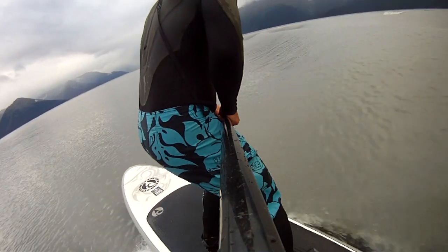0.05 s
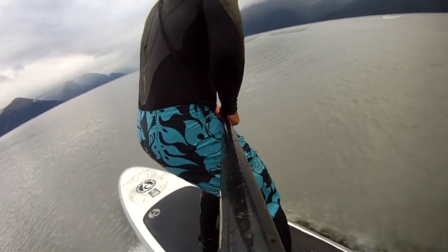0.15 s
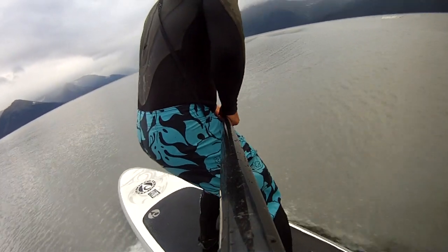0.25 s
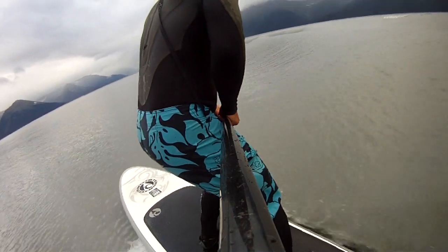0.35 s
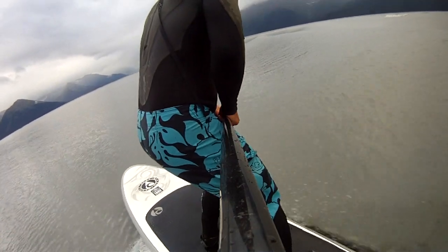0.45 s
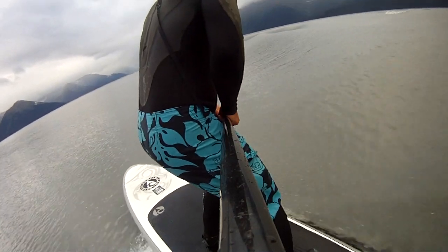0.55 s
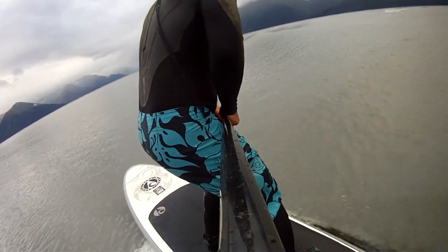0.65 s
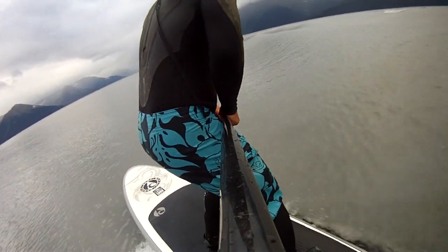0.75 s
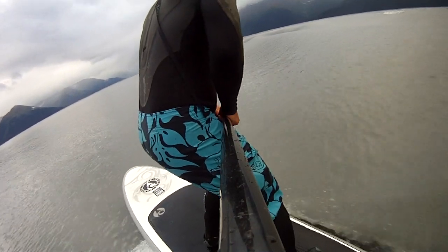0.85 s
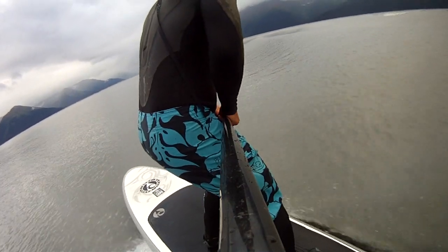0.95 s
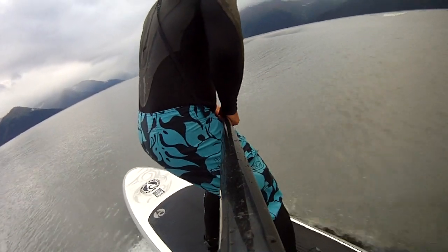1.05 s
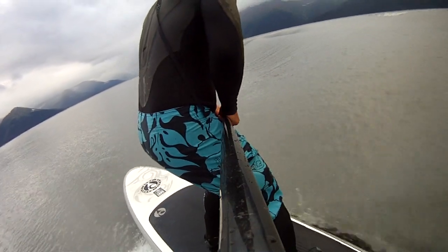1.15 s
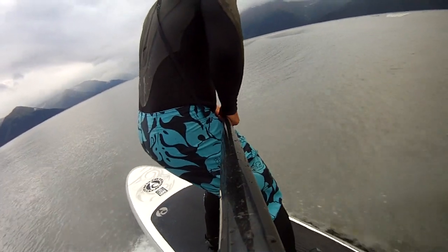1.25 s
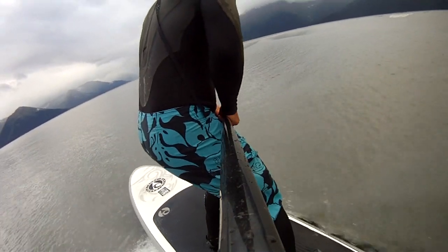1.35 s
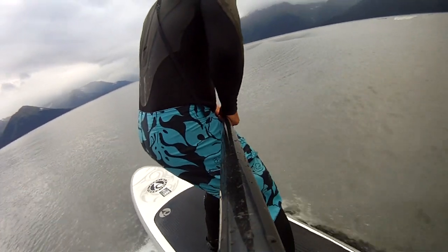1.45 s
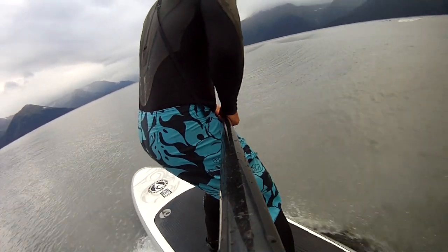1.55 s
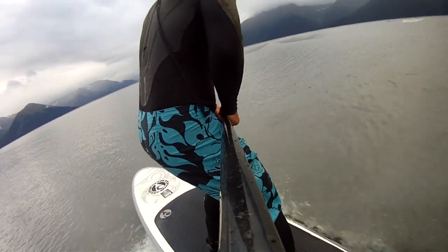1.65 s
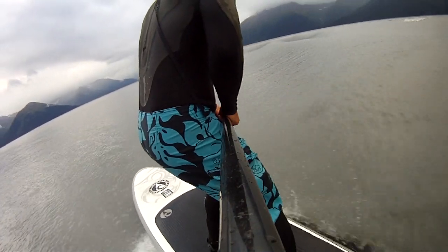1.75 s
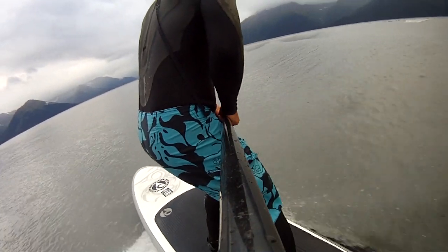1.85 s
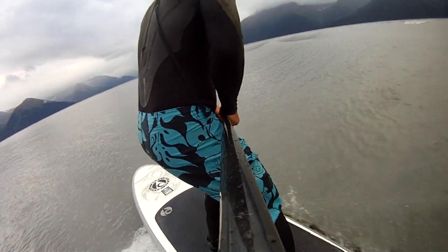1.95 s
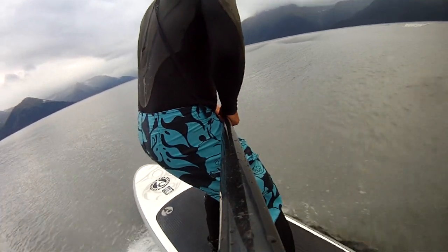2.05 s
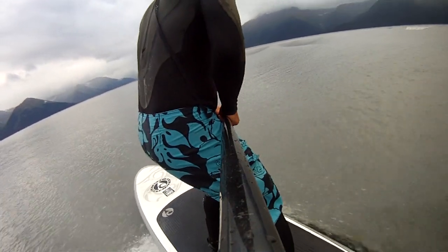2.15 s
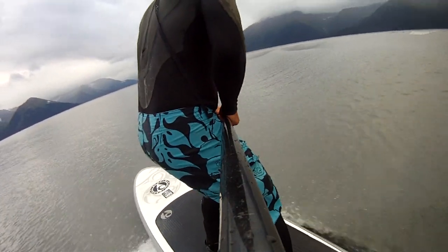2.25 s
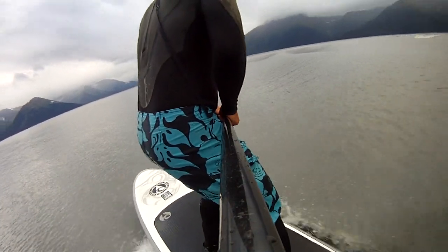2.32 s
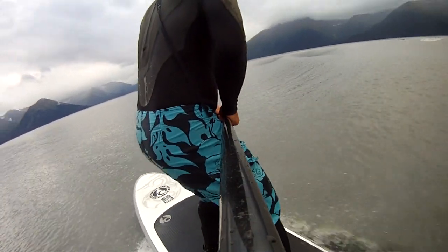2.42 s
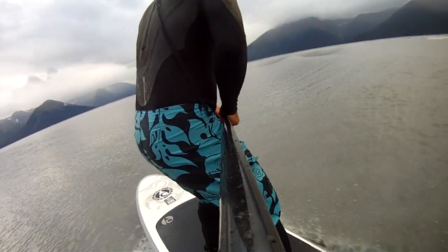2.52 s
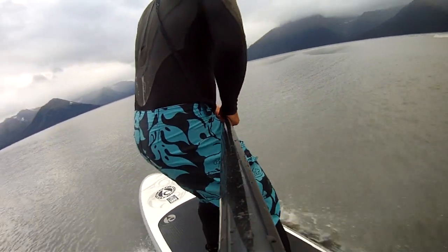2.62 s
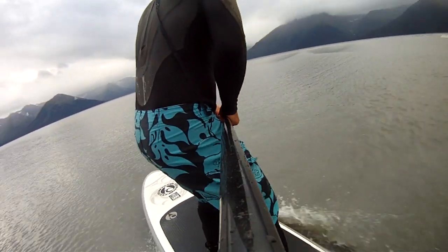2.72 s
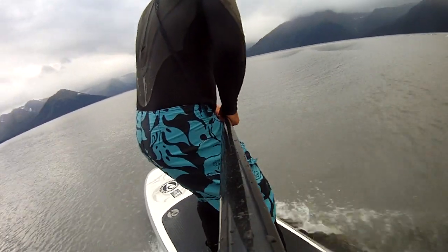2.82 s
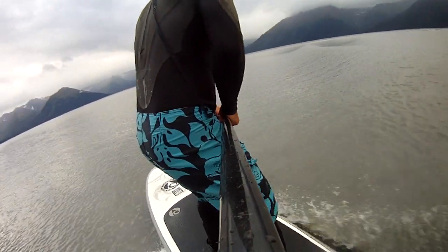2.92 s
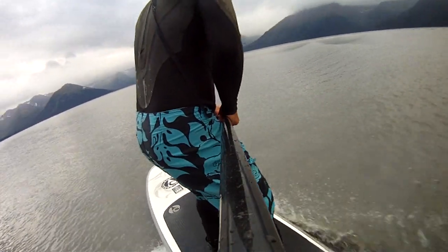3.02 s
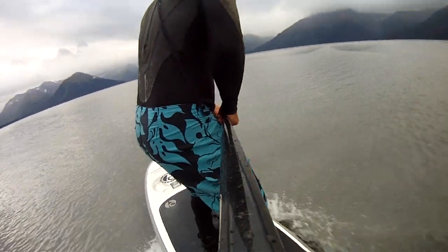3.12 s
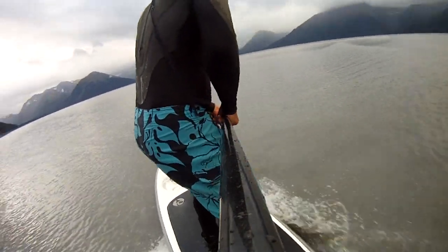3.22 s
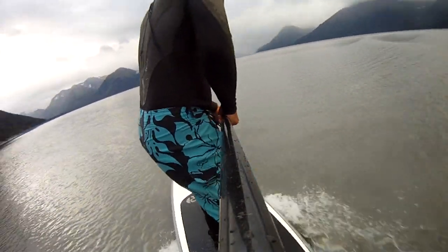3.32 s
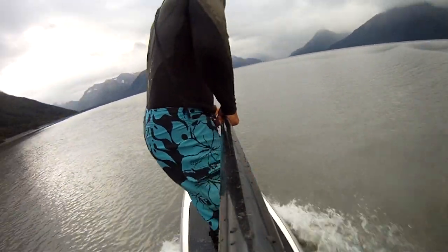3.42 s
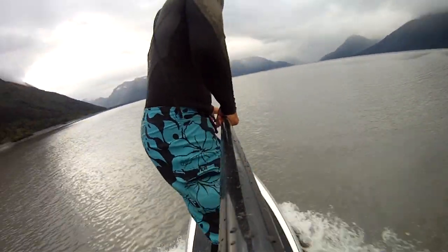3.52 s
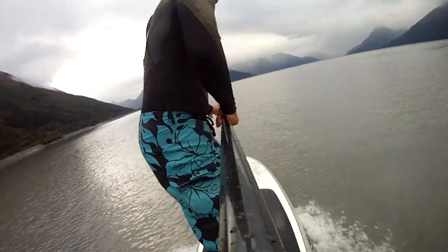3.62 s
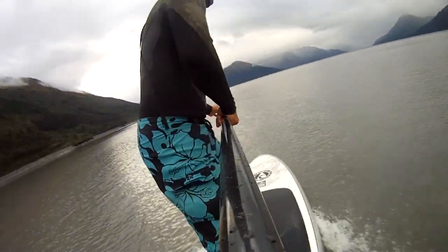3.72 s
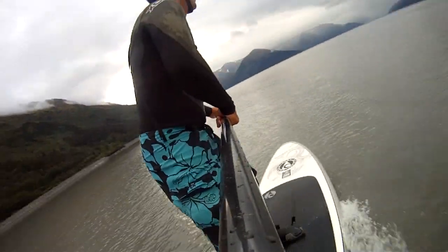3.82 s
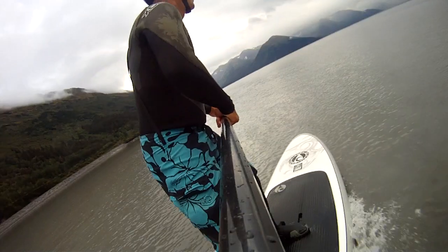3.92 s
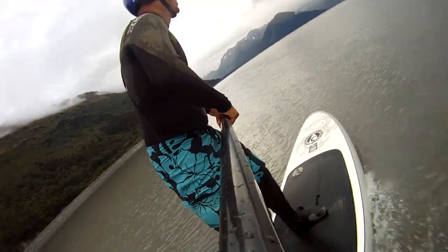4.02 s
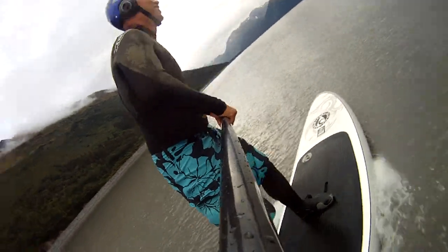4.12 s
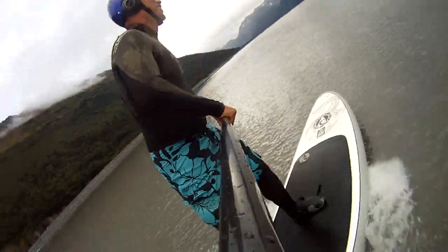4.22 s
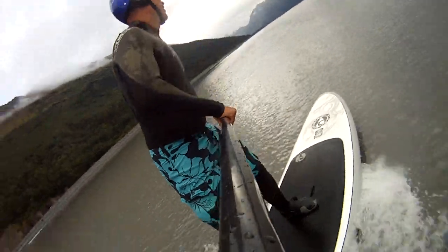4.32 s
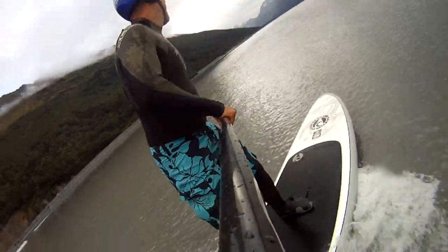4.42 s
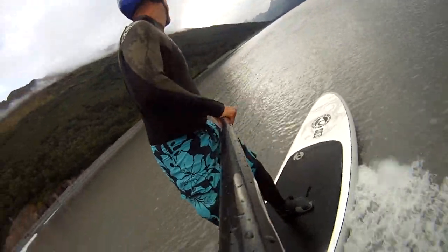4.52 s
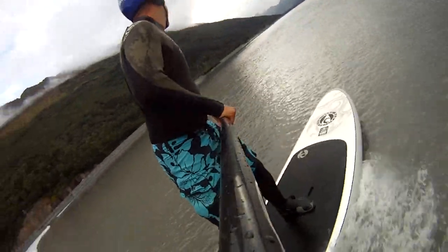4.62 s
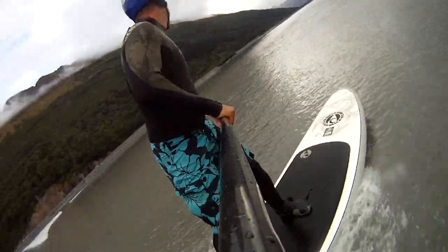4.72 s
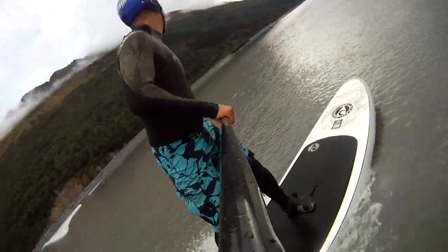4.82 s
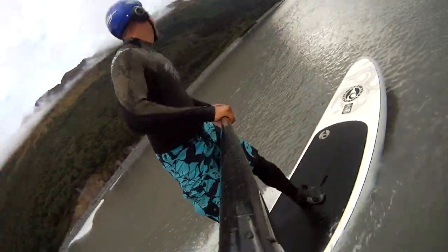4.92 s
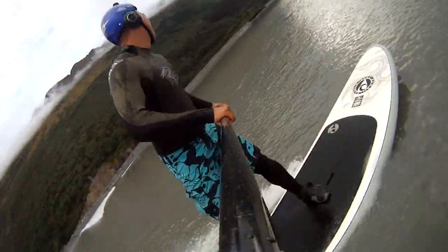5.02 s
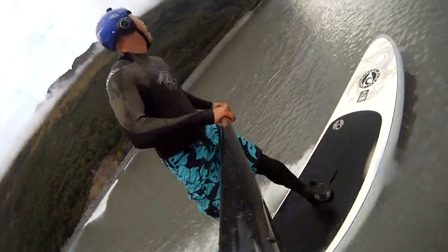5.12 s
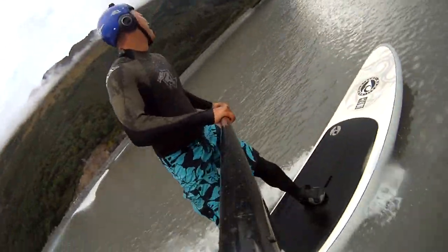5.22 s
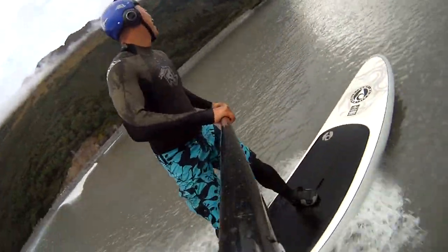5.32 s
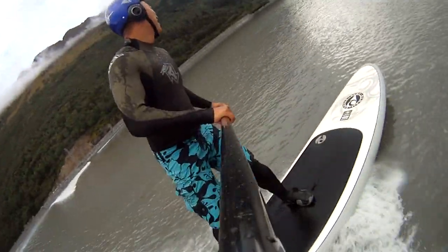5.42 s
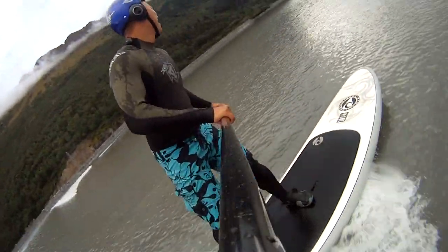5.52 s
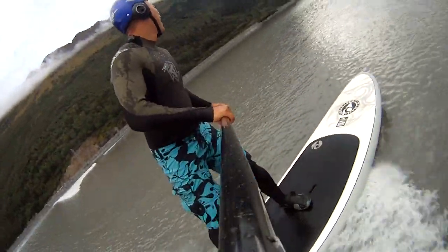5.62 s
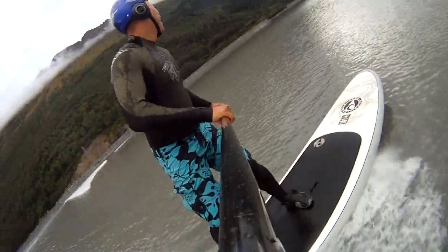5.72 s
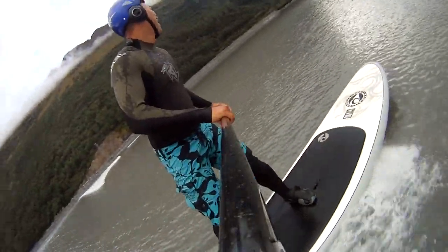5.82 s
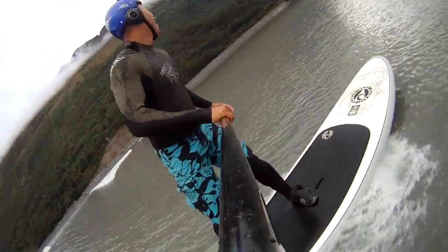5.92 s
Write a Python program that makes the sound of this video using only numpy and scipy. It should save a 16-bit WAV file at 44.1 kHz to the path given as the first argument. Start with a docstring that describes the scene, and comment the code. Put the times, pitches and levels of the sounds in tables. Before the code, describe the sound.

Close rushing spray and a low shudder as a paddleboard rides a wave, then thumps, clicks, a squeak and louder splashes.

```python
"""Spray and churning wake around a paddleboard on a wave, heard close up from the paddle.
The microphone is inside a camera's sealed housing, whose resonances colour the hiss of the water.
Drag keeps the paddle shaft shuddering at its bending mode. In a turn the shaft takes knocks and
the wet mount squeaks, clicks and creaks; then the board pounds over chop and the hull drums."""
import sys
import numpy as np
from scipy import signal
from scipy.fft import rfft, irfft, next_fast_len
from scipy.io import wavfile
from scipy.ndimage import uniform_filter1d, map_coordinates

SR = 44100
rng = np.random.default_rng(int(sys.argv[2]) if len(sys.argv) > 2 else 0)


def to_wav(s):
    """Save 16-bit WAV."""
    ch = np.atleast_2d(s).T  # columns
    pcm = np.round(np.clip(ch, -1, 1) * 32767)  # PCM
    wavfile.write(sys.argv[1], SR, pcm.astype(np.int16))


N = 262836

# Spray off the rail, easing as the board turns. Each row: time in seconds, level in dB before gain.
SPRAY_LEVELS = [(0.0, -43), (0.16, -45), (2.37, -45.5), (3.42, -48), (3.67, -50.5), (4.63, -49.5),
                (4.95, -54.5), (5.23, -55), (5.63, -49.5), (5.96, -51.5)]
# The board slapping into chop. Each row: start in seconds, hull drumming in dB, splash in dB.
SLAPS = [(3.17, -53, -44), (3.88, -38.5, -38), (4.78, -40.5, -42.5), (5.0, -50, -67)]
SLAP_RISE_S = 0.023
CRUISE_DB, WAKE_DB = -45.5, -42  # reference levels of spray and wake on the straight run


def spray():
    """Spray thrown off the rail patters and hisses through the housing."""
    # Its colour at the microphone. Each row: frequency in Hz, relative level in dB.
    colour = [(700, -32), (1300, -5), (2020, -7.5), (2300, 1.5), (2680, -2.5), (3050, -7), (3500, 0.5),
              (3800, -0.5), (4030, -8.5), (4700, -4.5), (5350, -4), (5700, -10.5)]
    drops = bubbles(rate=2500, hz=3530, cycles=0.98, spread_db=3.0)
    hiss = coloured(froth(drops, grain_db=-9.5, patchy_db=1.0), colour)
    return amp(curve(SPRAY_LEVELS) + 7) * hiss


def wake_level():
    """The wake's level in dB: it follows the spray and swells with the splash of each slap."""
    steady = amp(WAKE_DB + 0.53 * (curve(SPRAY_LEVELS) - CRUISE_DB))
    splash = sum(amp(db) * envelope(s, SLAP_RISE_S, SLAP_RISE_S, t60=1.95) for s, _, db in SLAPS)
    return 20 * np.log10(np.hypot(steady, splash))


def wake():
    """The wake churns with ringing bubbles."""
    # Its colour inside the housing. Each row: frequency in Hz, relative level in dB.
    colour = [(200, -52), (600, -26), (950, -15.5), (1130, -5.5), (1275, 1.5), (1470, -9), (1675, -3),
              (2010, -6), (2270, -6.5), (2650, -4.5), (3100, -12), (3520, -23), (4100, -36), (5600, -47)]
    cloud = bubbles(rate=1500, hz=1691, cycles=3.5, spread_db=1.5)
    churn = coloured(froth(cloud, grain_db=-9.5, patchy_db=0.5), colour)
    return amp(wake_level() + 0.24 * wobble(15)) * churn


def shudder():
    """Water dragging on the paddle keeps its bending mode swinging at a wandering pitch and strength."""
    # Strength of the shudder. Each row: time in seconds, overall level in dB before the mix.
    levels = [(0, -37), (2.58, -36.5), (2.75, -43), (3.5, -36), (4.05, -40), (4.25, -50), (4.4, -40),
              (4.7, -41.5), (5.1, -30.5), (5.35, -41), (5.96, -39.5)]
    # Loose rumble around the shaft's mode. Each row: frequency in Hz, relative level in dB.
    colour = [(12, -26), (25, -11), (38, 3), (52, -6.5), (64, -4), (80, -12), (120, -26), (300, -56)]
    level_db = curve(levels) + 3.2 * wobble(18)  # the drag comes and goes
    pitch = 51.5 * np.exp(0.0791 * wobble(25))
    swing = np.sqrt(2) * np.sin(2 * np.pi * np.cumsum(pitch) / SR)
    rumble = coloured(rng.standard_normal(N), colour)
    return amp(level_db) * (amp(-1.5) * swing + amp(-7.0) * rumble)


def knocks():
    """Each blow bends the shaft, which swings back for a few sagging cycles and rattles the housing."""
    # Blows on the shaft. Each row: start in seconds, peak of the swell in dB, settled pitch in Hz,
    # rise in seconds, rattle in dB relative to the swing.
    blows = [(3.140, -21.5, 44.2, 0.02, -38), (3.224, -19.5, 56.3, .013, -26),
             (3.246, -14.5, 52, 0.013, -26.5), (3.44, -19, 39.7, 0.0044, -9.5),
             (3.721, -24.5, 48.4, 0.0091, -38), (3.7642, -8, 55, 0.0045, -24.5),
             (3.84, -14.5, 73.4, 0.022, -18.5), (3.929, -26.5, 66, 0.013, -16),
             (3.974, -17, 53.5, 0.0056, -17), (4.796, -24, 79.5, 0.0035, -20),
             (4.884, -23, 54.5, 0.022, -24)]
    t60 = 0.12  # the hands damp every swing alike
    out, t = np.zeros(N), np.arange(SR // 2) / SR
    for s, db, hz, rise, rattle_db in blows:
        swell = (1 - np.exp(-(t / rise) ** 2)) * amp(-60 * t / t60)
        pitch = hz * (1 + 0.56 * np.exp(-t / 0.0069))  # stiffer while the blow still presses
        swing = -np.sin(2 * np.pi * np.cumsum(pitch) / SR)
        noise = rng.standard_normal(len(t))
        rattle = unit(filtered(noise, lambda f: (housing(f) + 1.04) / (1 + (f / 750) ** 2)))
        add(out, s, amp(db) * swell / swell.max() * (swing + amp(rattle_db) * rattle))
    return out


def ticks():
    """Brief contacts ring the housing, right at the microphone; brighter ones are shorter."""
    # Snaps of the mount and drops on the housing. Each row: start in seconds, peak in dB, centre in Hz.
    contacts = [(1.2247, -26, 3200), (2.355, -26.5, 3400), (3.142, -29.5, 1220), (3.214, -31, 1900),
                (3.764, -14.5, 2500), (3.765, -20, 880), (3.836, -24, 1600), (3.972, -19, 1200),
                (4.025, -28, 1870)]
    out, t = np.zeros(N), np.arange(SR // 5) / SR
    for s, db, hz in contacts:
        t60 = 0.031 * (1000 / hz) ** 1.2
        burst = rng.standard_normal(len(t)) * amp(-60 * t / t60)
        band = lambda f: resonance(f, hz, 0.82 * hz) ** 2 / (1 + (f / 3900) ** 16)
        ring = filtered(burst, lambda f: (housing(f) + 0.21) * band(f))
        add(out, s, amp(db) * ring / np.abs(ring).max())
    return out


def squeak():
    """Fast stick-slip sings a hoarse note that leaps and falls; at the top every other slip is weak."""
    # Wet rubber sliding on the mount. Each row: start in seconds, length in seconds, level in dB.
    slides = [(3.402, 0.042, -20)]
    slow_hz, fast_hz, peak_s, width_s = 656, 2147, 0.0125, 0.0155
    speed = np.exp(-((since(slides[0][0]) - peak_s) / width_s) ** 2)
    rate = slow_hz + (fast_hz - slow_hz) * speed
    turns = np.cumsum(rate * np.exp(0.08 * wobble(900))) / SR
    phase = 2 * np.pi * turns
    skipping = 0.43 * np.clip((rate - 1700) / 500, 0, 1)
    note = np.sin(phase) + amp(-9) * np.sin(2 * phase) + amp(-17) * np.sin(3 * phase)
    note += skipping * np.sin(phase / 2)
    slip_strengths = rng.standard_normal(int(turns[-1]) + 4)
    grip = 1 + 0.95 * map_coordinates(slip_strengths, [turns])
    passband = lambda f: f * f / (f * f + 450 ** 2) / (1 + (f / 3800) ** 12)
    return stroke(filtered(note * grip, lambda f: (housing(f) + 0.36) * passband(f)), slides)


def creak():
    """Slow, quickening slips knock on the housing and the shaft under it; each one grinds briefly."""
    # The mount's joint under load. Each row: start in seconds, length in seconds, level in dB.
    strains = [(3.972, 0.063, -31)]
    slow_hz, fast_hz, quicken_s = 90.4, 202, 0.025
    speed = 1 - np.exp(-(since(strains[0][0]) / quicken_s) ** 2)
    rate = slow_hz + (fast_hz - slow_hz) * speed
    turns = np.cumsum(rate * np.exp(0.07 * wobble(700))) / SR
    slips = np.diff(np.floor(turns), prepend=0) * amp(2.2 * rng.standard_normal(N))
    grinding = amp(-24) * np.exp(-3 * (turns % 1)) * rng.standard_normal(N)
    body = lambda f: (housing(f) + 0.18 + amp(10.5) * resonance(f, 170, 53)) / (1 + (f / 2200) ** 8)
    return stroke(filtered(slips + grinding, body), strains)


def pounding():
    """Chop drums dully on the hull underfoot: lightly all the time, hard after each slap."""
    # Drumming of the hull. Each row: frequency in Hz, relative level in dB.
    colour = [(40, -4.5), (90, 10.5), (130, -3.5), (185, -1.5), (250, -9), (400, -23.5), (1000, -43)]
    steady = amp(-55 + 0.1 * (curve(SPRAY_LEVELS) - CRUISE_DB))
    slaps = sum(amp(db) * envelope(s, SLAP_RISE_S, SLAP_RISE_S, t60=1.36) for s, db, _ in SLAPS)
    return np.hypot(steady, slaps) * coloured(rng.standard_normal(N), colour)


def slosh():
    """Water sloshes beside the board, gently following the wake's level."""
    # Its hollow colour. Each row: frequency in Hz, relative level in dB.
    colour = [(60, 1.5), (190, -7.5), (290, 1.5), (420, -1.5), (535, 0.5), (650, -2), (740, -1.5),
              (900, -2.5), (1300, -3), (3000, -39)]
    return amp(-52 + 0.27 * (wake_level() - WAKE_DB)) * coloured(rng.standard_normal(N), colour)


def housing(f):
    """Response of the sealed housing to a touch, heard from inside."""
    # Its modes. Each row: frequency in Hz, width in Hz, gain in dB.
    modes = [(314, 150, -11), (510, 127, 3), (738, 52, 2), (1068, 87, 0.5), (1286, 136, 1.5),
             (1780, 120, -4), (1900, 310, -15), (2495, 77, -8), (2620, 240, -25), (3660, 350, -3)]
    return sum((-1) ** k * amp(db) * resonance(f, hz, width) for k, (hz, width, db) in enumerate(modes))


def bubbles(rate, hz, cycles, spread_db):
    """A cloud of short damped rings, rate a second, scattered in size and an octave either side of hz."""
    when, tuning, rarity = np.hsplit(rng.random((int(rate * N / SR), 3)), 3)
    t = np.arange(SR // 150) / SR
    pitch = hz * 2 ** (2 * tuning - 1)
    size = amp(-spread_db * np.log(np.maximum(rarity, 2e-3)))
    rings = size * np.sin(2 * np.pi * pitch * t) * np.exp(-pitch * t / cycles)
    at = (when * N).astype(int) + np.arange(len(t))
    return unit(np.bincount(at.ravel(), rings.ravel(), N)[:N])


def froth(grains, grain_db, patchy_db):
    """Near grains over a blur of far ones, with patches of random gain in time and frequency."""
    spectra = signal.stft(rng.standard_normal(N) + amp(grain_db) * grains, nperseg=512)[2]
    patches = uniform_filter1d(rng.standard_normal(spectra.shape), size=7, axis=0)
    patches = uniform_filter1d(patches, size=10, axis=1)
    return signal.istft(spectra * amp(patchy_db * unit(patches)), nperseg=512)[1][:N]


def stroke(x, rows):
    """Give a friction sound the strength of its stroke: it grips, holds and lets go."""
    strength = np.sqrt(np.abs(uniform_filter1d(x ** 2, size=300)) + 1e-12)
    gain = sum(amp(db) * envelope(s, rise=0.0038, hold=length, t60=0.042) for s, length, db in rows)
    return gain * x / strength


def amp(db):
    """Decibels to gain."""
    return 10 ** (np.asarray(db) / 20)


def unit(x):
    """Scale to rms 1."""
    return x / np.sqrt(np.mean(x ** 2) + 1e-20)


def curve(rows):
    """One value per sample along (seconds, value) rows."""
    return np.interp(np.arange(N) / SR, *np.transpose(rows))


def wobble(rate):
    """A smooth random curve, rate knots a second."""
    return map_coordinates(rng.standard_normal(int(N * rate / SR) + 4), [np.arange(N) * rate / SR])


def since(s):
    """Seconds since time s, zero before it."""
    return np.maximum(np.arange(N) / SR - s, 0)


def envelope(s, rise, hold, t60):
    """Attack from time s, hold and release, as a gain; all times in seconds."""
    return (1 - np.exp(-(since(s) / rise) ** 2)) * amp(-60 * since(s + hold) / t60)


def filtered(x, response):
    """x through a complex response of frequency."""
    size = next_fast_len(len(x) + SR // 2)
    return irfft(rfft(x, size) * response(np.fft.rfftfreq(size, 1 / SR)), size)[:len(x)]


def coloured(x, spectrum):
    """x with a (Hz, dB) colour, at rms 1."""
    f, db = np.transpose(spectrum)
    return unit(filtered(x, lambda hz: amp(np.interp(np.log(hz + 1), np.log(f), db))))


def resonance(f, hz, width):
    """Causal response of one mode."""
    return 1j * f * width / (hz * hz - f * f + 1j * f * width)


def add(track, s, sound):
    """Mix a sound in at time s."""
    part = track[round(s * SR):][:len(sound)]
    part += sound[:len(part)]


def scene():
    """Everything reaches one microphone inside the housing on the paddle."""
    surge = amp(0.28 * wobble(20))  # small surges shared by all the white water
    water = surge * (wake() + spray() + slosh())
    mono = water + pounding() + shudder() + knocks() + ticks() + squeak() + creak()
    return np.array([mono, mono])


def record(dry):
    """The camera samples slowly and holds each value, which mirrors the sound into the treble."""
    hold_hz, top_hz = 12000, 15350
    narrow = filtered(dry[0], lambda f: 1 / np.sqrt(1 + (f / 5600) ** 44))
    carrier = 1 + 2 * np.cos(2 * np.pi * hold_hz * np.arange(N) / SR)
    droop = lambda f: np.sinc(f / hold_hz) / np.sinc(f / (4 * hold_hz)) * (f < top_hz)
    held = filtered(narrow * carrier, droop)
    return np.array([held, held])


dry = scene()
out = record(dry)
to_wav(out)
```